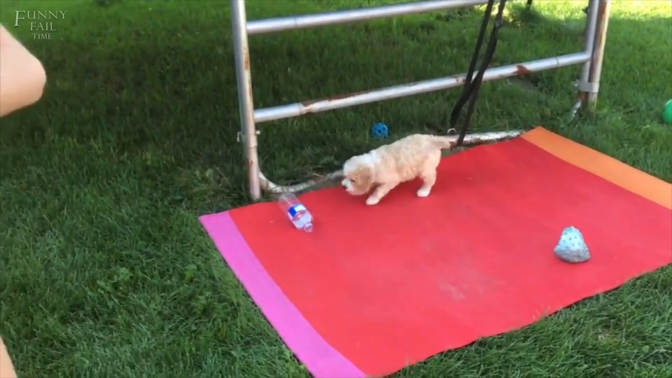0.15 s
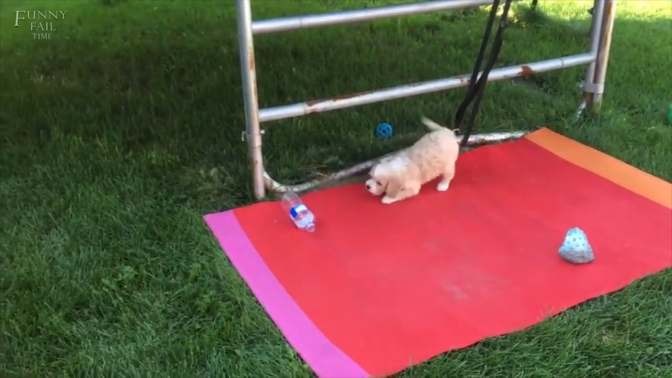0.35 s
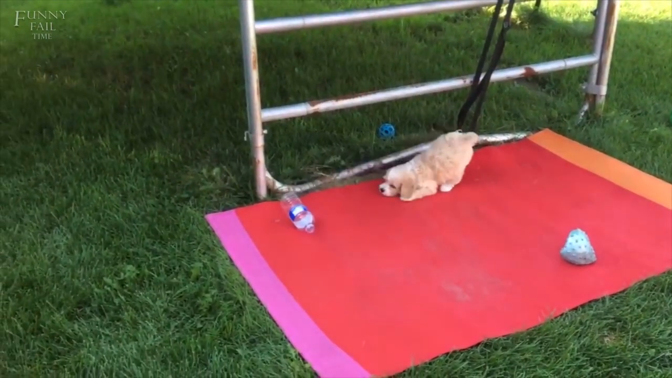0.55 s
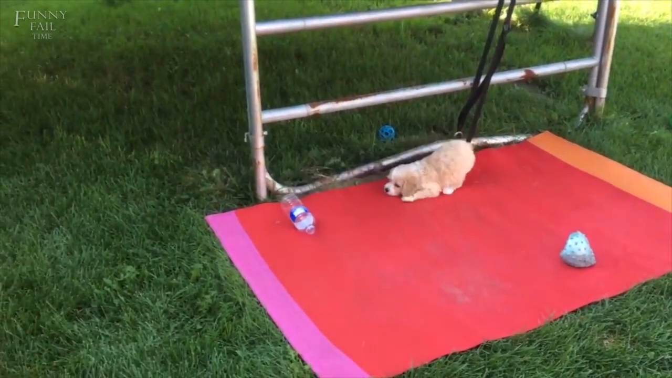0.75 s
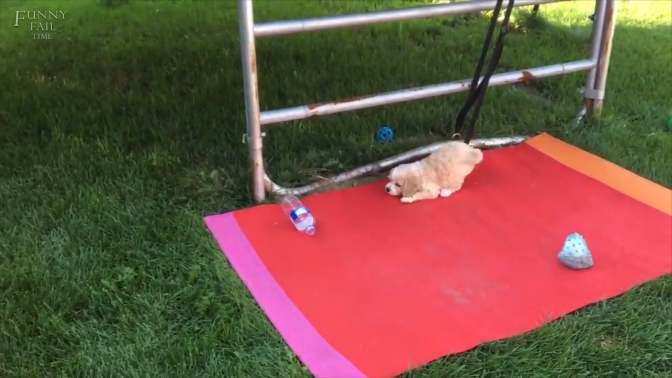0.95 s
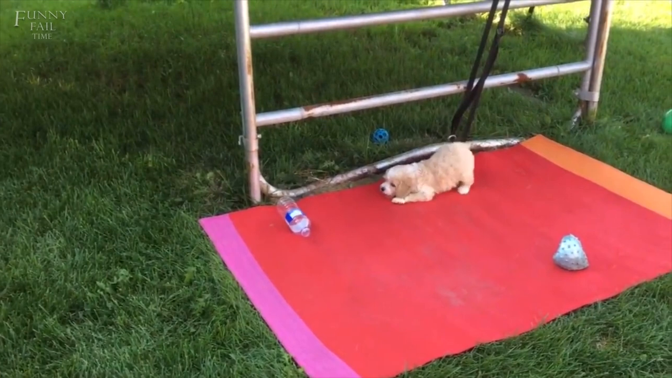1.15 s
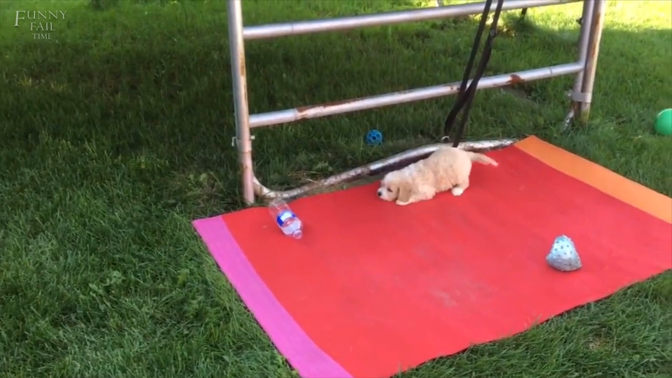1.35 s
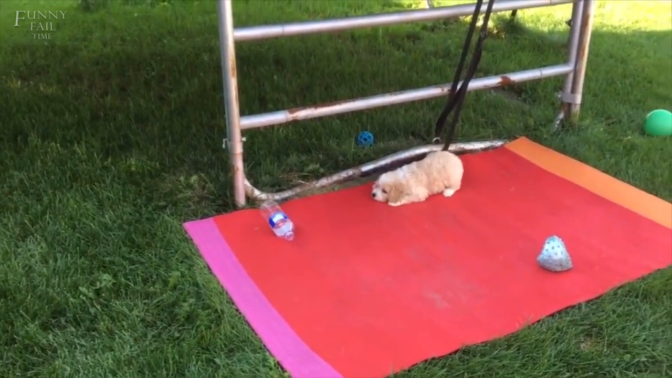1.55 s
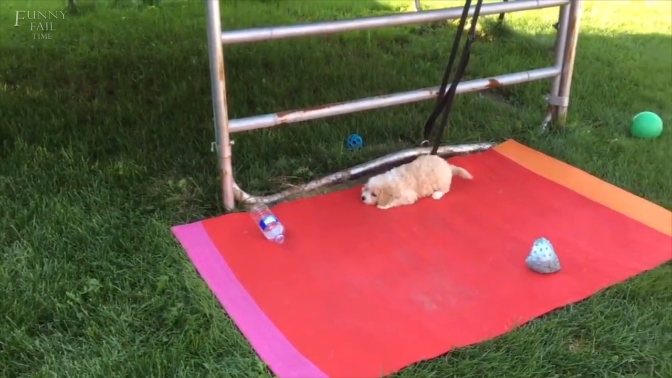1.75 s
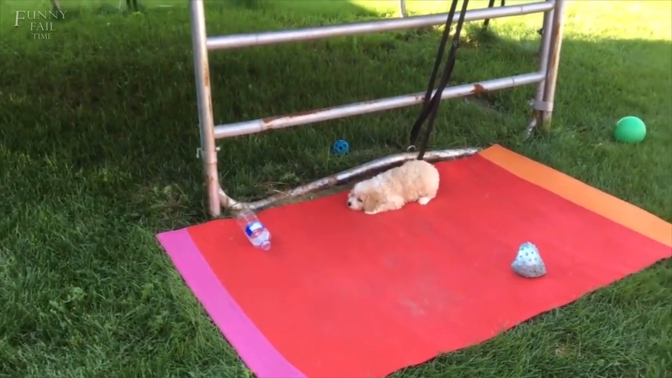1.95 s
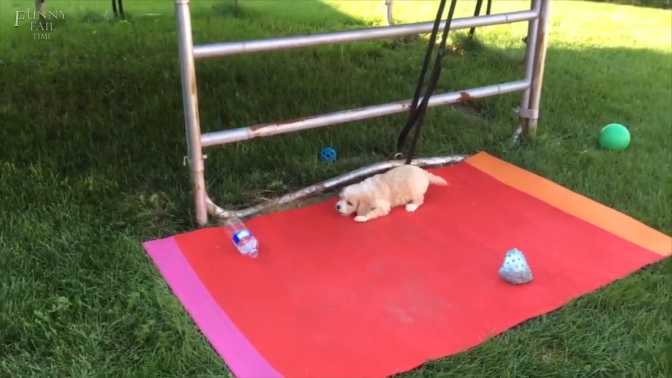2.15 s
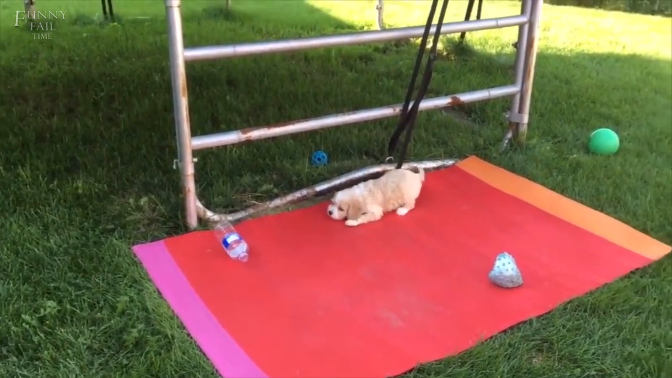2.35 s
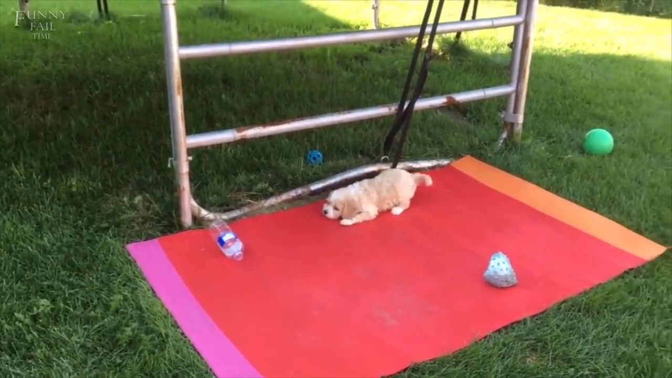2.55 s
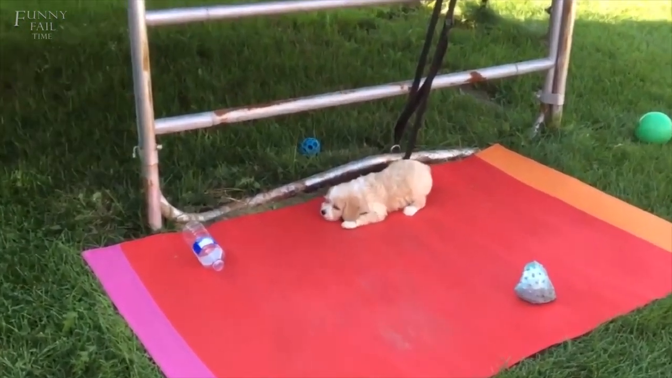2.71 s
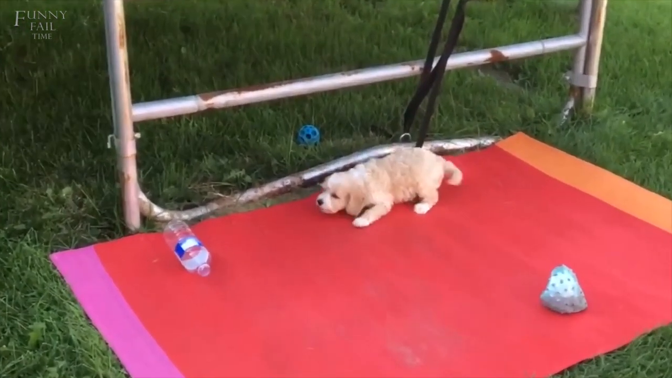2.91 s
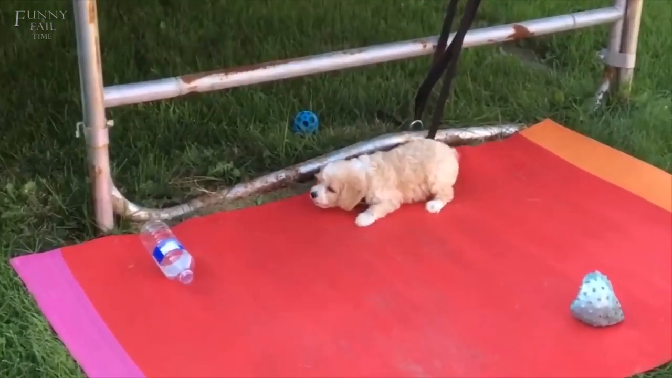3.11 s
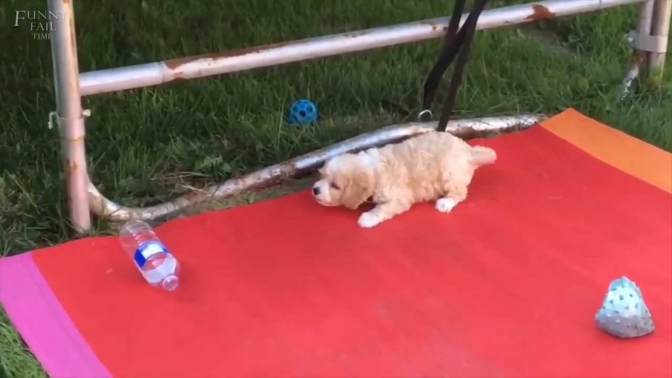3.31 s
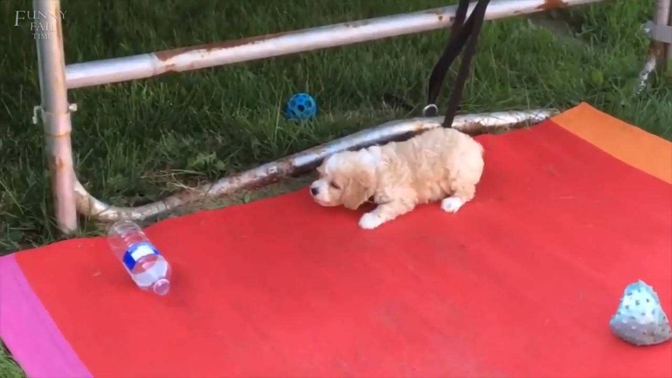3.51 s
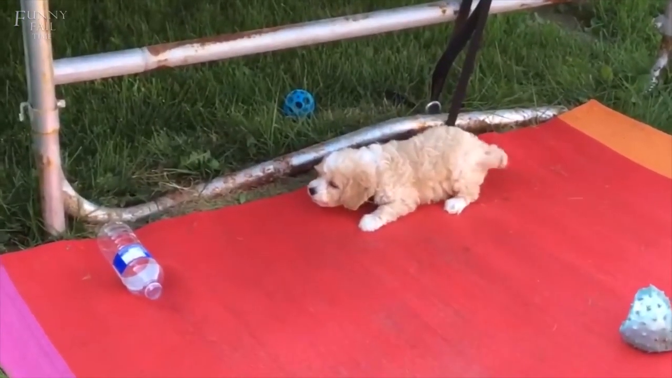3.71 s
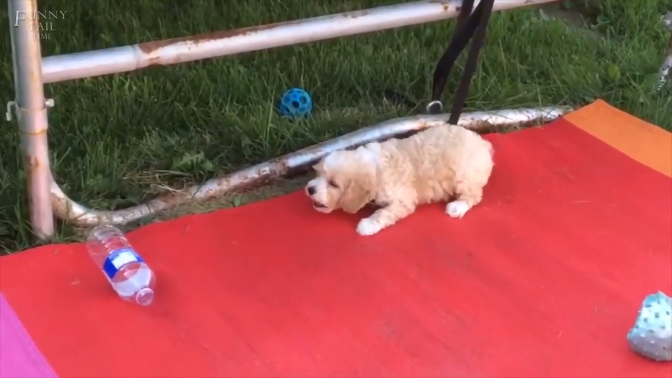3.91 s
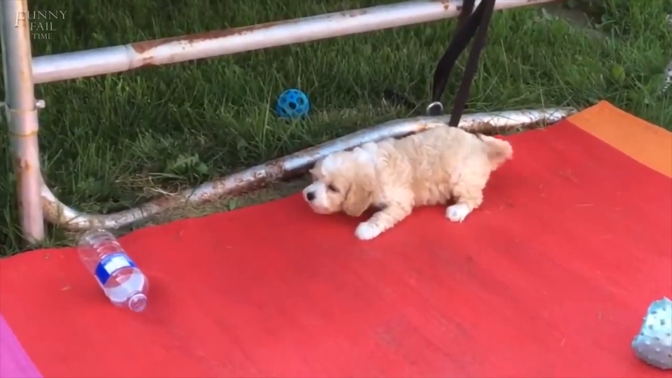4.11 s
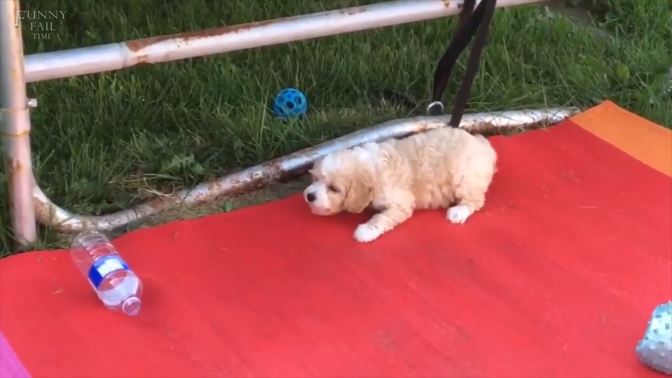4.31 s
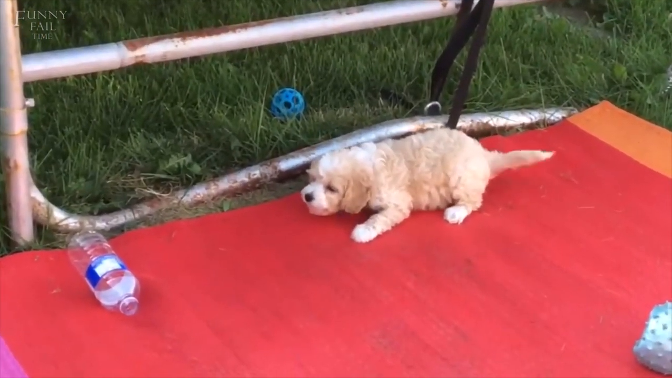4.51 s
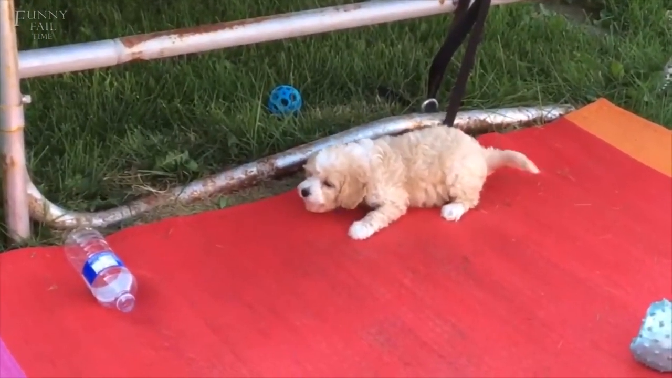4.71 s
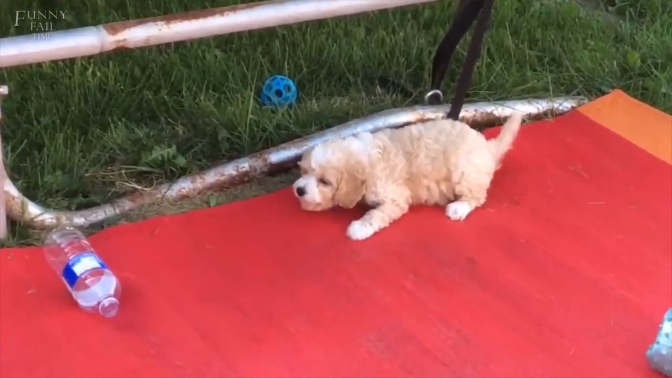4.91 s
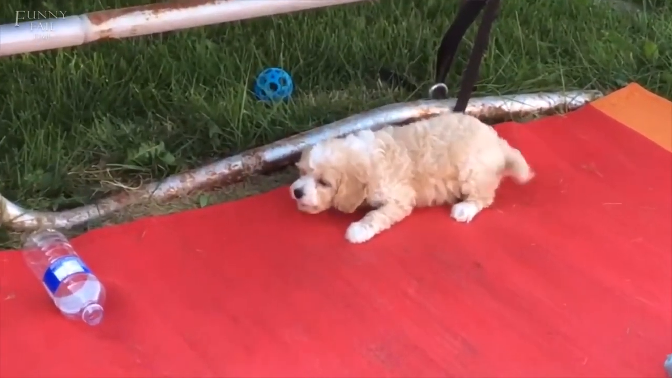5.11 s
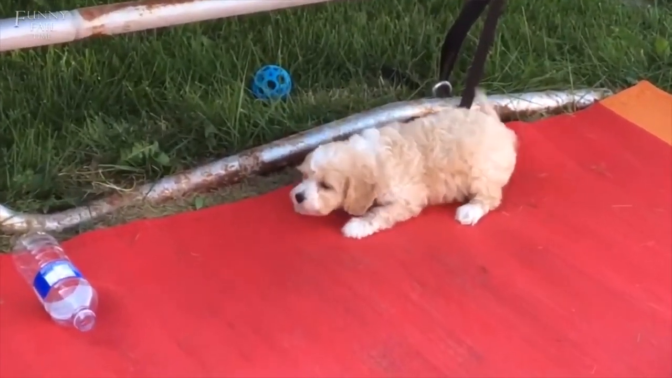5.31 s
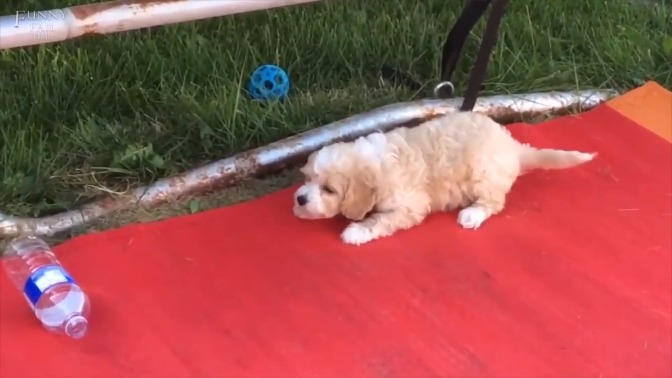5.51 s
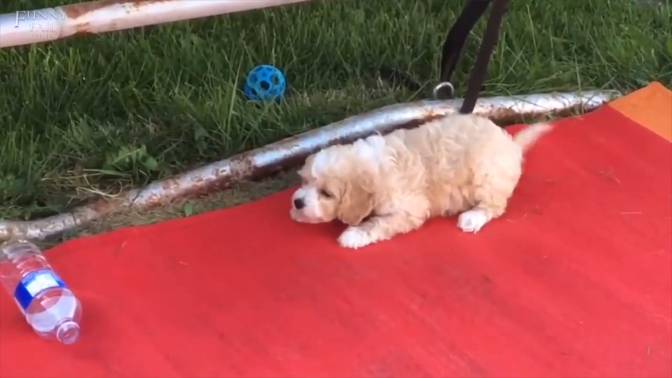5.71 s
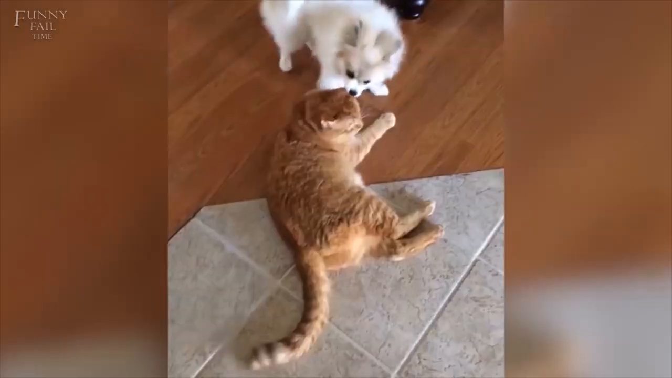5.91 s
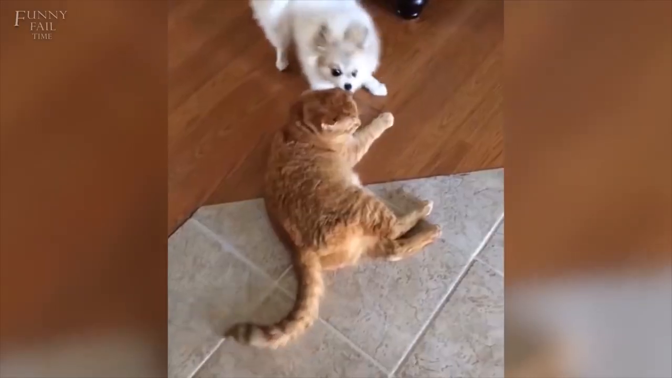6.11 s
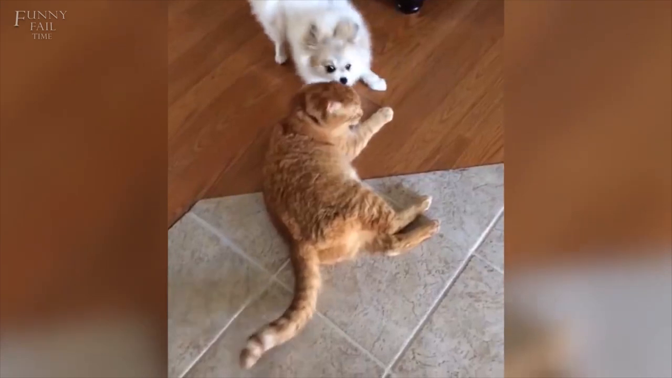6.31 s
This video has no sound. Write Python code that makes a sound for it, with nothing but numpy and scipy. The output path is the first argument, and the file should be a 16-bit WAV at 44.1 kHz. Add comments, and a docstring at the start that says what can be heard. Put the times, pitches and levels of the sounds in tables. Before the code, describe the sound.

A tiny puppy gives six short, high, raspy yelping barks on a lawn, over soft outdoor rumble, then an abrupt cut to a quiet room.

```python
"""Open air rumbles, rushes and hisses as shaped noise under a far engine's drone and a faint sine whine.
Small things scuff and tick: filtered noise bursts. A puppy on a lawn barks six times: a low growl of shaky
partials rises and breaks into a high raspy yelp, a near-sine with overtones and breath; some sink back to a growl.
Walls echo each bark through a decaying noise tail, a fence rail rings along, and loud barks push the level down.
At the end a cut leads to a quiet room: soft shaped noise, wavering mains hum and a few last scuffs."""
import sys
import numpy as np
from scipy import signal
from scipy.fft import rfft, irfft, next_fast_len
from scipy.io import wavfile
from scipy.ndimage import uniform_filter1d, minimum_filter1d, map_coordinates

SR = 44100
rng = np.random.default_rng(int(sys.argv[2]) if len(sys.argv) > 2 else 0)


def wrap_up_sound(samples):
    """Save the sound to the file named by the first command line argument, as 16-bit audio."""
    columns = np.atleast_2d(samples).T
    # keep every value between -1 and 1, then stretch to whole-number steps
    tamed = np.clip(columns, -1, 1)
    steps = np.round(tamed * 32767).astype(np.int16)
    wavfile.write(sys.argv[1], SR, steps)


N = 280076
T = np.arange(N) / SR  # time in seconds
CUT_S = 5.857  # from lawn to room

# Open air. Each row: time in seconds, rush level in dB, hiss level in dB.
OUTDOOR_LEVELS = [(0, -54, -69), (.84, -54.5, -72), (4.17, -58, -74), (5.8, -60, -73.5)]
# Colour of the rumble, the rush and the hiss. Each row: frequency in Hz, relative level in dB.
RUMBLE_SPECTRUM = [(8.8, -31.5), (30, -12), (45, -5), (64, -7.5), (97, -9.5), (252, -21), (300, -18),
                   (390, -38), (660, -120)]
RUSH_SPECTRUM = [(150, -27.5), (200, -4), (300, -4), (450, -0.5), (1250, -5.5), (1700, -9), (2200, -9),
                 (3000, -20.5), (3900, -19.5), (4800, -28), (7000, -30), (9000, -120)]
HISS_SPECTRUM = [(2940, -31), (5000, -14), (6610, -1.5), (7720, -1.5), (9460, 0), (10300, -2.5),
                 (13000, 5.5), (15500, -11.5)]
RUMBLE_DB = -52.3
# The far engine's firing tone and its octave. Each row: time in seconds, level in dB.
ENGINE_LEVELS = [(0, -49), (.7, -60.5), (.8, -50), (1.3, -58.5), (1.6, -50.5), (2.35, -62), (2.55, -54.5),
                 (2.88, -82), (2.93, -46), (3.15, -55), (3.3, -43), (4.0, -50), (4.25, -41), (4.78, -43.5),
                 (4.85, -56.5), (5.05, -42.5), (5.35, -49.5), (5.85, -50)]
ENGINE_OCTAVE_LEVELS = [(0, -62.5), (2.4, -69.5), (2.6, -60), (4.4, -56.5), (5.85, -56)]
ENGINE_HZ = 69
# Faint whine. Each row: time in seconds, pitch in Hz, peak level in dB.
WHINE_PATH = [(0, 2248, -59), (1.2, 2170, -65.5), (2.5, 2143, -77), (3.5, 1992, -82), (3.7, 2014, -64.5),
              (4.7, 2023, -66), (4.9, 2022, -81), (5.75, 2010, -73.5)]

# Scuffs. Each row: start in seconds, relative level in dB, centre in Hz, width in Hz, time to fall 12 dB in seconds.
SCUFF_EVENTS = [(0.225, -61, 6600, 6040, 0.13), (1.058, -54, 1160, 1170, 0.094),
                (1.232, -53, 1920, 1460, 0.027), (1.664, -45.5, 1885, 890, 0.057),
                (2.654, -55, 1855, 908, 0.043), (3.229, -51, 343.4, 300.5, 0.08),
                (3.503, -53, 597, 986, 0.11), (6.01, -69, 1618, 264.5, 0.12),
                (6.014, -72, 2014, 2080, 0.041), (6.016, -62, 524, 299, 0.051),
                (6.121, -73, 2000, 1980, 0.026), (6.285, -77, 2154, 2486, 0.0081)]
# Ticks. Each row: start in seconds, relative level in dB, centre in Hz.
TICK_EVENTS = [(0.627, -32.5, 8510), (1.9629, -42, 6180), (1.9813, -56, 6690), (2.041, -47.5, 9225),
               (2.049, -45.5, 10760), (4.4308, -48, 7946)]

# Growls, low register. Each row: full voice in seconds, lead-in in seconds, hold in seconds, start in Hz,
# resting pitch in Hz, full-voice pitch in Hz, end in Hz, then murmur, full and end level in dB before the partials.
GROWL_CALLS = [(.435, 0.067, 0.049, 201.5, 201.8, 286.3, 663, -75, -49.5, -39.5),
               (1.32, 0.07, 0.024, 223.9, 225.6, 310.7, 480, -66.5, -46.5, -50),
               (2.171, .06, .042, 169.8, 169.7, 290.4, 630.4, -73, -53, -40),
               (2.335, .055, 0.029, 459.2, 449.4, 391.6, 270.5, -77, -49, -56),
               (2.925, .375, .02, 163.8, 194.2, 301.4, 389.8, -64.5, -51.5, -50),
               (4.018, .5, 0.0268, 242.5, 200.4, 350, 462.6, -59.5, -43.5, -53.5),
               (5.24, 0.072, 0.043, 223.9, 222.7, 294.2, 366.3, -63, -49.5, -44),
               (5.45, 0.049, 0.028, 473.6, 461.7, 367.4, 344.5, -85.5, -50, -54)]
# Growl partials, from the fundamental up. Each entry: relative level in dB.
GROWL_PARTIAL_LEVELS = [3.5, 4, 2.5, -4, -11, -13, -16.5, -23]
GROWL_SWELL_S = .05  # from murmur to full voice
GROWL_STOP_S, GROWL_STOP_DB = 0.022, -61  # dying away
# pitch starts creeping up at most this long before full voice, by this share of the climb
GROWL_CREEP_S, GROWL_CREEP = .14, .3

# Yelps, high register; levels are relative. Each row: onset in seconds; from there to loudest, to highest and
# length, in seconds; onset, highest and end pitch in Hz; roundness of the rise; tone in dB; swell from the onset
# and fade to the end in dB; rasp in dB; burst of rasp at the break in dB; onset to burst in seconds;
# mouth in dB; breath in dB.
YELP_CALLS = [(0.462, 0.055, 0.09, 0.13, 1040, 1223, 1083, 3.1, -14.5, 14.5, 16.5, -23.5, -37.5, 0.0088, -18.5, -32),
              (1.331, .02, 0.0225, .026, 1270, 1385, 1360, 1.35, -24.5, 5.5, 2, -33.5, -22.5, 0.03, -15.5, -26),
              (1.354, 0.055, 0.082, .12, 1094, 1317, 975, 1.15, -12.5, 10, 23.5, -27, -23.5, .002, -17.5, -33),
              (2.199, 0.054, 0.078, 0.12, 1021, 1246, 1118, 1.7, -14, 22.5, 10, -25.5, -26, 0.031, -15.5, -33.5),
              (2.946, 0.083, 0.12, .145, 899.3, 1240, 1045, 2.2, -15.5, 11.5, 14, -35.5, -27, 0.014, -15, -37.5),
              (4.029, 0.079, 0.1, 0.16, 857.4, 1245, 999.7, 1.9, -17, 11, 12.5, -31, -34.5, .015, -20, -25.5),
              (5.286, 0.082, .09, 0.15, 935, 1293, 1018, 1.67, -15, 14.5, 18, -25.5, -33.5, 0.037, -15.5, -24.5)]
# Yelp overtones, multiples 2 and up. Each entry: relative level in dB.
YELP_OVERTONE_LEVELS = [2.5, -5, -15, -18, -23]
# Resonances of the throat, the mouth and the breath past the teeth.
# Each row: centre in Hz, width in Hz, relative level in dB.
THROAT_MODES = [(1331, 300, 6), (1865, 510, -2.5), (2408, 450, -1.5), (3060, 580, -7.5), (3590, 490, 2.5),
                (4340, 540, -6.5)]
MOUTH_MODES = [(4664, 820, -3.5), (5704, 900, -3.5), (8260, 1200, -18)]
TEETH_MODES = [(9190, 330, -4), (11600, 1700, -7), (14500, 1400, 0)]
# Edges of a yelp. Each row: seconds before the onset (attack) or after the end (release), relative level in dB.
YELP_ATTACK = [(0, 0), (.011, -17), (.035, -27), (.06, -59.5)]
YELP_RELEASE = [(0, 0), (.01, -19), (.04, -24), (.065, -60)]
EFFORT_BEND, FALL_BEND = 1.44, 1.9  # roundness of the arch of effort and of the pitch fall
CLIMB_HZ_PER_S, DROP_HZ_PER_S = 5000, 12000  # slides before the onset and once the folds slacken
RASP_SWELLS, RASP_FADES, RASP_EDGE = 0.66, 0.61, .75  # shares of the swell, the fade and the edges
BURST_S = .018  # width of the burst of rasp
MOUTH_FLICKER_DB = 2.5

# Walls nearby. Each row: frequency in Hz, time for the echo to fall 60 dB in seconds.
ECHO_DECAY = [(500, 0.74), (1200, 0.27), (4000, 0.34), (10000, 0.084)]
ECHO_DB, ECHO_DELAY = -25.5, 700  # level in dB, delay in samples
RAIL_HZ, RAIL_WIDTH_HZ, RAIL_DB = 1235, 15, -5.5

# Indoor air. Each row: frequency in Hz, relative level in dB.
ROOM_SPECTRUM = [(20, -30.5), (50, -9), (120, -2.5), (200, -8), (500, -18.5), (900, -24), (2500, -32.5),
                 (5000, -36), (9000, -39), (15000, -51)]
ROOM_DB = -68.5
# Mains hum. Each row: frequency in Hz, level in dB.
MAINS_LINES = [(59.2, -69.5), (118.4, -64.5), (166.9, -67.5)]

DUCK_DB, DUCK_ABOVE_DB, DUCK_HOLD_S = 3.5, -31, .21  # gain control depth, threshold and hold
TOP_HZ = 15600  # band limit


def amp(db):
    """dB to gain."""
    return 10 ** (np.asarray(db) / 20)


def unit(x):
    """Scaled to rms 1."""
    return x / np.sqrt(np.mean(x ** 2) + 1e-20)


def along(points, hz):
    """(Hz, value) points read on a log frequency axis."""
    f, value = np.transpose(points)
    return np.interp(np.log(hz + 1), np.log(f + 1), value)


def curves(rows, t=T):
    """One value per sample for each column after the time."""
    s, *columns = np.transpose(rows)
    return [np.interp(t, s, column) for column in columns]


def wobble(rate):
    """A smooth random curve, rate knots a second."""
    knots = rng.standard_normal(int(N * rate / SR) + 4)
    return map_coordinates(knots, [T * rate])


def turning(hz):
    """Phase in radians of a tone that follows a pitch curve."""
    return 2 * np.pi * np.cumsum(hz) / SR


def filtered(x, response):
    """x times a complex response of frequency."""
    m = next_fast_len(len(x) + SR // 2)
    return irfft(rfft(x, m) * response(np.fft.rfftfreq(m, 1 / SR)), m)[:len(x)]


def resonance(f, hz, width_hz):
    """One causal resonance, gain 1 at its centre."""
    return 1j * f * width_hz / (hz * hz - f * f + 1j * f * width_hz)


def rush(spectrum, patchy_db):
    """Coloured noise of rms 1, its time-frequency patches given random gain."""
    z = signal.stft(rng.standard_normal(N), nperseg=512)[2]
    field = uniform_filter1d(rng.standard_normal(z.shape), size=6, axis=0)
    field = uniform_filter1d(field, size=12, axis=1)
    patchy = signal.istft(z * amp(patchy_db * unit(field)), nperseg=512)[1][:N]
    return unit(filtered(patchy, lambda hz: amp(along(spectrum, hz))))


def open_air():
    """Rumble, rush and hiss: three bands of patchy noise, each with a wavering level."""
    rush_db, hiss_db = curves(OUTDOOR_LEVELS)
    air = amp(RUMBLE_DB + 2.2 * wobble(4.1)) * rush(RUMBLE_SPECTRUM, patchy_db=0.5)
    air += amp(rush_db + 0.34 * wobble(12)) * rush(RUSH_SPECTRUM, patchy_db=0.67)
    air += amp(hiss_db + 0.64 * wobble(4)) * rush(HISS_SPECTRUM, patchy_db=3.2)
    return air


def far_engine():
    """An unsteady firing tone and its octave, each swelling and sinking."""
    firing = turning(ENGINE_HZ * (1 + .012 * wobble(9)))
    drone = np.zeros(N)
    for k, db in enumerate(curves(ENGINE_LEVELS) + curves(ENGINE_OCTAVE_LEVELS)):
        drone += np.sqrt(2) * amp(db + 0.71 * wobble(11)) * np.sin((k + 1) * firing)
    return drone


def whine():
    """A faint sine with a jittery pitch and a wavering level."""
    hz, db = curves(WHINE_PATH)
    return amp(db + 1.3 * wobble(29)) * np.sin(turning(hz + 40 * wobble(60)))


def outdoors():
    """The sounds around the lawn, silent from the cut on."""
    return (open_air() + far_engine() + whine()) * (T < CUT_S)


def small_sounds():
    """Scuffs are noise puffs in one broad resonance; ticks are cracks that fall 60 dB in 2.2 ms, then filtered."""
    out, t = np.zeros(N + SR), T[:SR // 4]
    for s, db, hz, width_hz, length in SCUFF_EVENTS:
        noise = rng.standard_normal(len(t))
        grain = unit(filtered(noise, lambda f: resonance(f, hz, width_hz) ** 2))
        rise = 1 - np.exp(-t / (0.057 * length))
        out[round(s * SR):][:len(t)] += amp(db - 12 * (t / length) ** 1.4) * rise * grain
    for s, db, hz in TICK_EVENTS:
        crack = rng.standard_normal(len(t)) * amp(-60 * t / 0.0022)
        out[round(s * SR):][:len(t)] += amp(db) * filtered(crack, lambda f: resonance(f, hz, 1.4 * hz) ** 2)
    return out[:N]


def growl_shape(full, lead, held, start_hz, low_hz, full_hz, end_hz, murmur_db, full_db, end_db):
    """Murmur, creep, swell, hold, stop: rows of (s, Hz, dB)."""
    crept_hz = low_hz + GROWL_CREEP * (full_hz - low_hz)
    return [(full - lead, start_hz, murmur_db),
            (full - min(GROWL_CREEP_S, .98 * lead), low_hz, murmur_db),
            (full - GROWL_SWELL_S, crept_hz, murmur_db),
            (full, full_hz, full_db),
            (full + held, end_hz, end_db),
            (full + held + GROWL_STOP_S, end_hz, GROWL_STOP_DB)]


def growl_controls():
    """The growls joined into pitch and level curves, and a mask that fades in while one sounds."""
    shapes = [growl_shape(*row) for row in GROWL_CALLS]
    sounding = sum((T >= rows[0][0]) & (T <= rows[-1][0]) for rows in shapes) > 0
    hz, level_db = [uniform_filter1d(c, size=250) for c in curves(sum(shapes, []))]
    return uniform_filter1d(1. * sounding, size=1100), hz, level_db


def growls():
    """Slack folds around the yelp: a low, shaky stack of partials, each smeared by uneven cycles."""
    sounding, hz, level_db = growl_controls()
    phase = turning(hz * (1 + .045 * wobble(140)))
    stack = np.zeros(N)
    for k, db in enumerate(GROWL_PARTIAL_LEVELS):
        smear = 1 / (1 + .7 * k) + .45 * wobble(200)
        stack += amp(db) * smear * np.sin((k + 1) * phase)
    return sounding * np.sqrt(2) * amp(level_db) * stack


def tract(f, modes):
    """Steep resonances side by side, with alternating sign."""
    return sum((-1) ** k * amp(db) * resonance(f, c, w) ** 2 for k, (c, w, db) in enumerate(modes))


def through(x, modes):
    """x through the resonances, at rms 1."""
    return unit(filtered(x, lambda f: tract(f, modes)))


def arch(t, top, length, gain, loss, bend_up, bend_down):
    """0 at time top, falling by gain back to time 0 and by loss on to the length."""
    before = np.clip(1 - t / top, 0, 1)
    after = np.clip((t - top) / (length - top), 0, 1)
    return -gain * before ** bend_up - loss * after ** bend_down


def yelp_controls():
    """Effort and pitch each trace an arch; rasp follows effort and bursts at the break. The strongest yelp sounds."""
    (onset, loudest, highest, length, from_hz, top_hz, end_hz, bend,
     tone_db, swell_db, fade_db, rasp_db, burst_db, burst_s,
     mouth_db, breath_db) = np.transpose(YELP_CALLS)[..., None]
    t = T - onset
    edges, = np.add(curves(YELP_ATTACK, -t), curves(YELP_RELEASE, t - length))
    effort = arch(t, loudest, length, swell_db, fade_db, EFFORT_BEND, EFFORT_BEND)
    slides = CLIMB_HZ_PER_S * np.clip(-t, 0, .06) + DROP_HZ_PER_S * np.clip(t - length, 0, .06)
    pitch_arch = arch(t, highest, length, top_hz - from_hz, top_hz - end_hz, bend, FALL_BEND)
    hz = top_hz + pitch_arch - slides
    burst = amp(burst_db) * np.exp(-((t - burst_s) / BURST_S) ** 2)
    follows = np.where(t < loudest, RASP_SWELLS, RASP_FADES)
    rasp = 20 * np.log10(amp(rasp_db + follows * effort + RASP_EDGE * edges) + burst)
    tone = tone_db + effort + edges
    strongest = tone.argmax(axis=0)[None]
    controls = np.broadcast_arrays(edges > -59, hz, tone, rasp, mouth_db, breath_db)
    chosen = [np.take_along_axis(c, strongest, axis=0)[0] for c in controls]
    return [uniform_filter1d(1. * c, size=250) for c in chosen]


def yelp_voice(phase, hz, tone_db, rough):
    """A near-sine fold vibration with overtones, unsteady where the rasp is strong."""
    # the folds mostly hold their swing but stumble now and then: brief notches
    voice = amp(tone_db + 1.5 - 5 * rough * wobble(260) ** 2) * np.sin(phase)
    # overtones grow more slowly with effort than the fundamental, and break up sooner
    for k, db in enumerate(YELP_OVERTONE_LEVELS, start=2):
        flicker = 1 - .5 * rough + .8 * rough * wobble(300)
        lift = (0.07 + np.abs(tract(k * hz, THROAT_MODES))) ** .5  # brighter while crossing a throat resonance
        level = amp(db - 16 + 0.78 * tone_db + 3.8 * wobble(60))
        voice += level * flicker * lift * np.sin(k * phase)
    return voice


def yelp_breath(phase, mouth_db, breath_db, rough):
    """Air rushes out once a cycle and excites throat, mouth and teeth."""
    puffs = rng.standard_normal(N) * (1 + .8 * np.sin(phase)) * amp(1.5 * wobble(150))
    mouth_gain = amp(mouth_db - 3.5 + 5.6 * rough + MOUTH_FLICKER_DB * wobble(30))
    teeth_gain = amp(breath_db + 2.0 + 2.6 * wobble(30))
    breath = through(puffs, THROAT_MODES)
    breath += mouth_gain * through(puffs, MOUTH_MODES)
    breath += teeth_gain * through(puffs, TEETH_MODES)
    return breath


def uneven_cycles(phase):
    """Alternate cycles and a slow tissue flap add weak lines beside the overtones."""
    # every second cycle differs a little: lines halfway between the overtones
    halves = wobble(120) * np.sin(3 * phase / 2) + wobble(120) * np.sin(5 * phase / 2)
    # a second, slower flap of tissue tears short side lines off the overtones
    flap = turning(300 + 90 * wobble(25))
    torn = sum(wobble(70) * np.sin(k * phase + side * flap) for k in (2, 3) for side in (-1, 1))
    return 0.55 * halves + 0.62 * torn


def yelps():
    """Tight folds sing a high tone, roughened by breath and uneven cycles."""
    sounding, hz, tone_db, rasp_db, mouth_db, breath_db = yelp_controls()
    rough = np.clip(amp(rasp_db - tone_db), 0, 1) ** .5
    phase = turning(hz * (1 + .03 * rough * wobble(400)))
    voice = yelp_voice(phase, hz, tone_db, rough)
    rasp = yelp_breath(phase, mouth_db, breath_db, rough) + uneven_cycles(phase)
    return sounding * (np.sqrt(2) * voice + amp(rasp_db - 3) * rasp)


def fence_rail(x):
    """A steel fence rail rings along in one narrow resonance."""
    return amp(RAIL_DB) * filtered(x, lambda f: resonance(f, RAIL_HZ, RAIL_WIDTH_HZ))


def yard_echo(x):
    """The walls answer with a delayed noise tail; each frequency dies at its own speed."""
    hz, t, z = signal.stft(rng.standard_normal(SR // 2), SR, nperseg=256)
    decay = amp(-60 * t / along(ECHO_DECAY, hz)[:, None])
    tail = signal.istft(z * decay, SR, nperseg=256)[1]
    delayed = np.pad(x, (ECHO_DELAY, 0))
    return amp(ECHO_DB) * signal.fftconvolve(delayed, tail / np.linalg.norm(tail))[:N]


def room():
    """Indoor air as soft noise and mains hum as wavering sines, from the cut on."""
    hum = sum(np.sqrt(2) * amp(db + 2.8 * wobble(5)) * np.sin(2 * np.pi * hz * T) for hz, db in MAINS_LINES)
    indoor_air = amp(ROOM_DB) * rush(ROOM_SPECTRUM, patchy_db=.6)
    return (hum + indoor_air) * (T >= CUT_S)


def scene():
    """The puppy with its rail and echo over the lawn, then the room."""
    background = outdoors() + small_sounds()
    puppy = growls() + yelps()
    return (background + puppy + fence_rail(puppy) + yard_echo(puppy) + room())[None]


def record(dry):
    """Gain control steps down on loud sound and holds a while; nothing passes above the band limit."""
    level = np.sqrt(np.abs(uniform_filter1d(dry[0] ** 2, size=800)))
    quiet = 1. * (level < amp(DUCK_ABOVE_DB))
    hold = round(DUCK_HOLD_S * SR)
    open_gain = minimum_filter1d(quiet, size=hold, origin=(hold - 1) // 2)  # looks back over the hold
    gain = amp(-DUCK_DB * (1 - uniform_filter1d(open_gain, size=1200)))
    return filtered(gain * dry[0], lambda hz: hz < TOP_HZ)[None]


dry = scene()
out = record(dry)
wrap_up_sound(out)
```